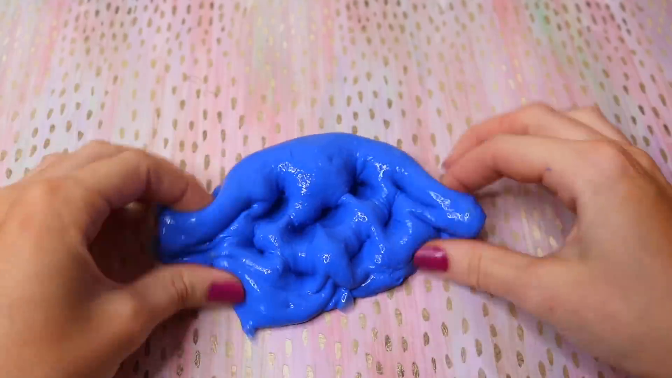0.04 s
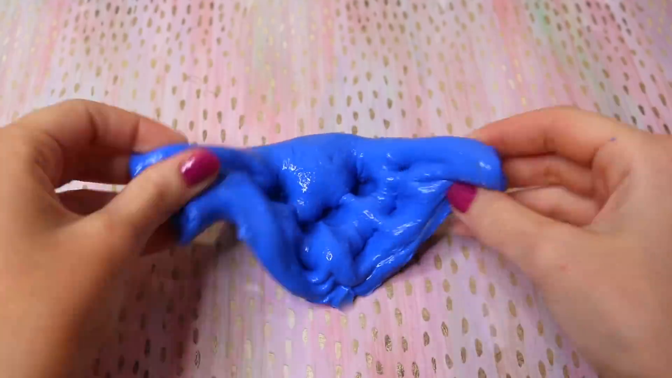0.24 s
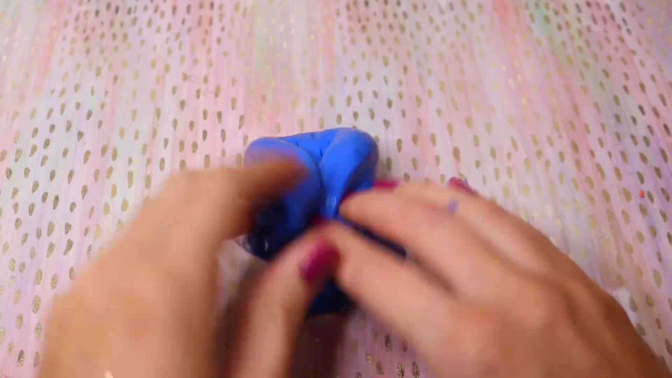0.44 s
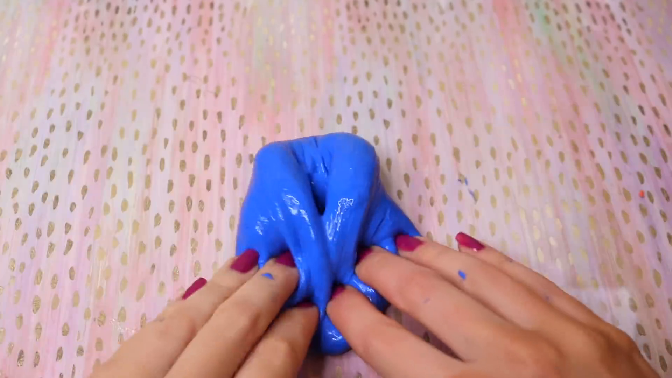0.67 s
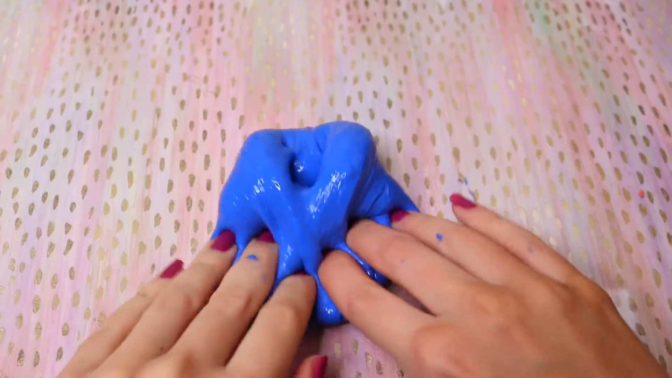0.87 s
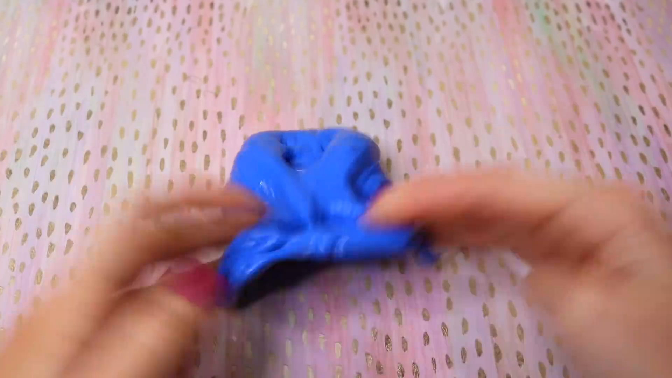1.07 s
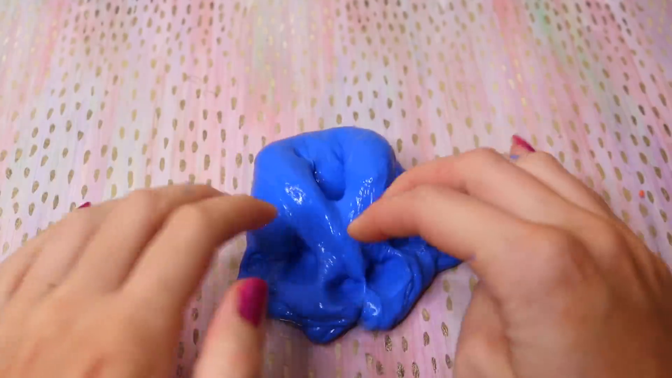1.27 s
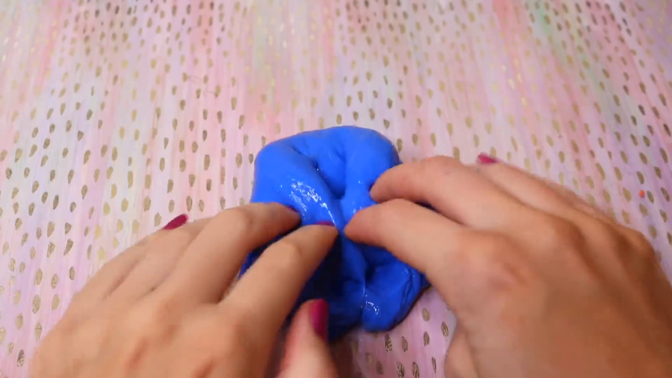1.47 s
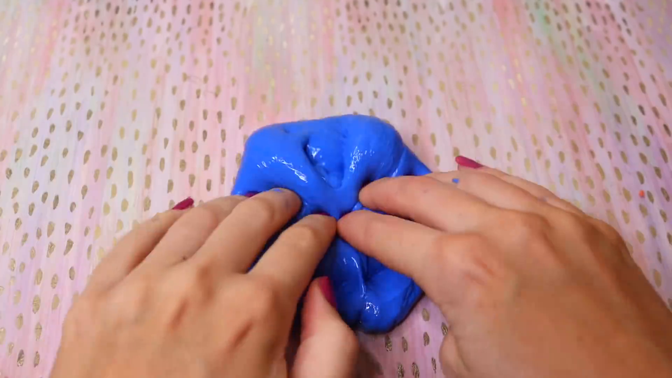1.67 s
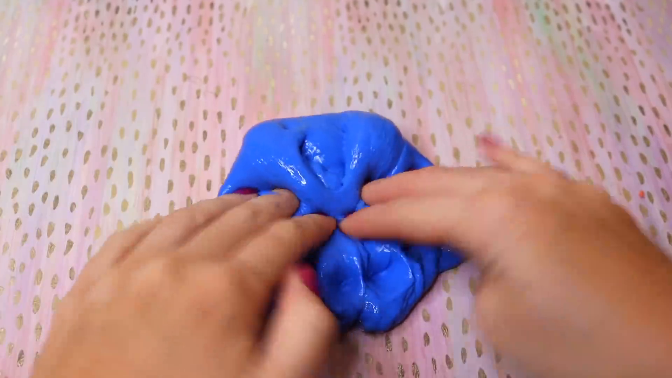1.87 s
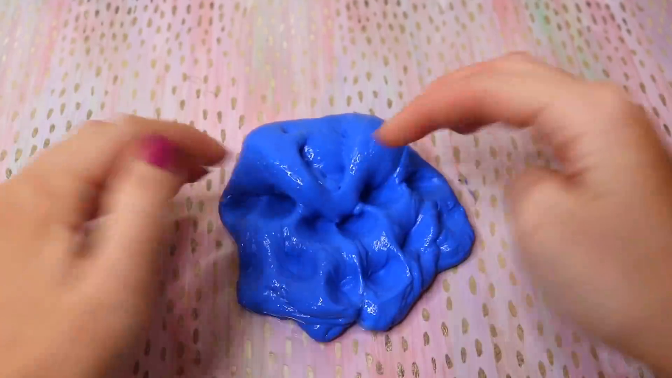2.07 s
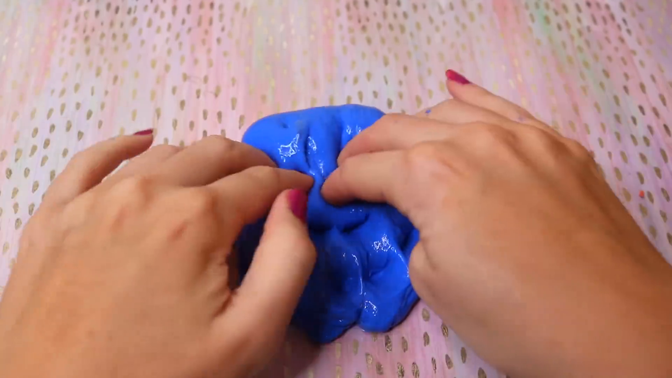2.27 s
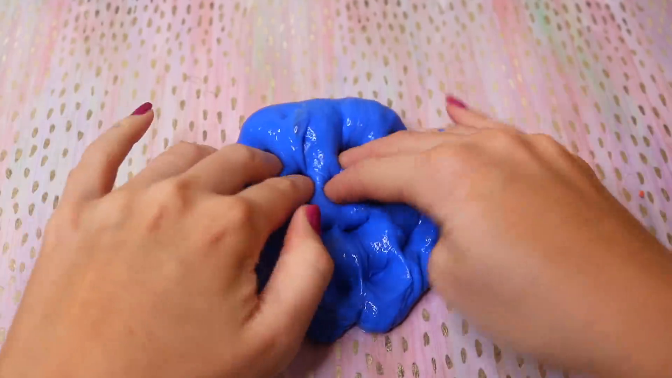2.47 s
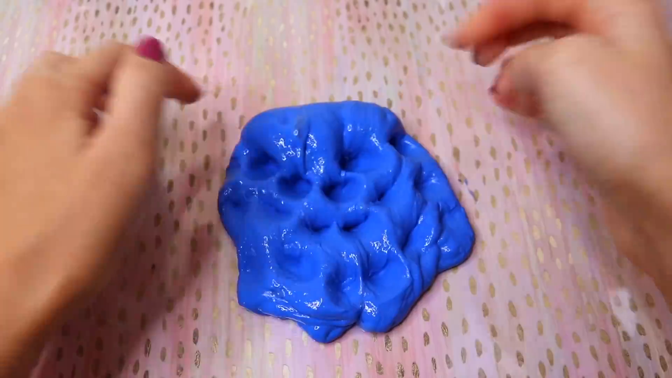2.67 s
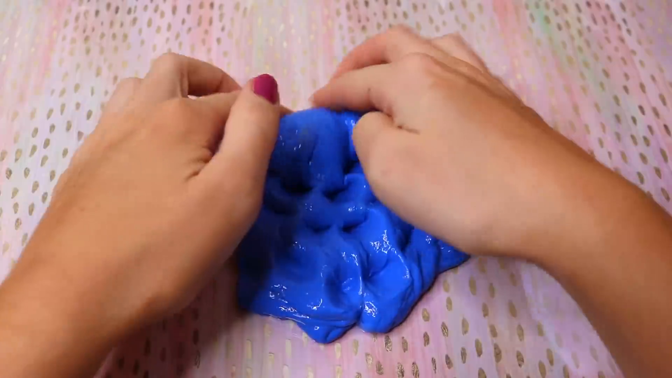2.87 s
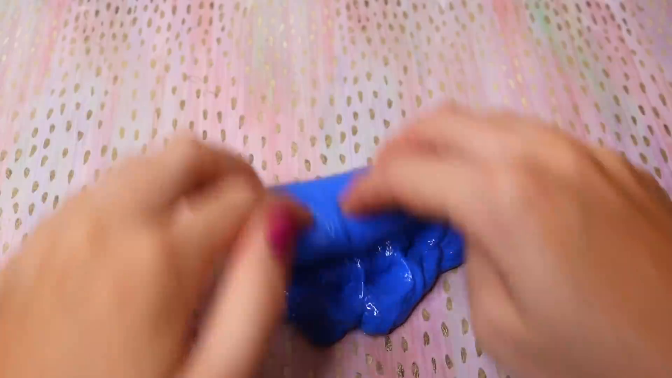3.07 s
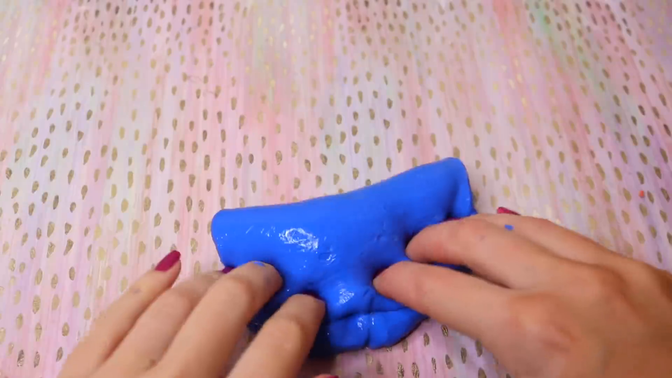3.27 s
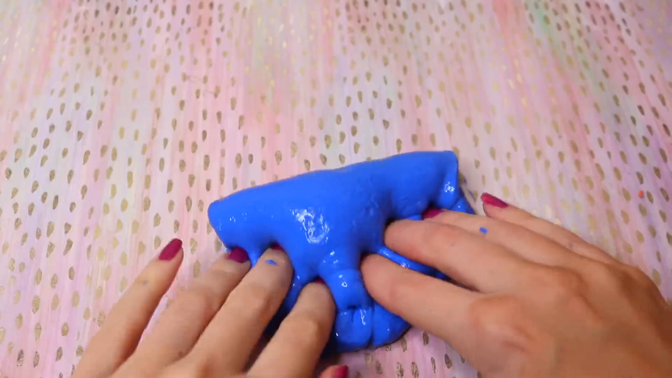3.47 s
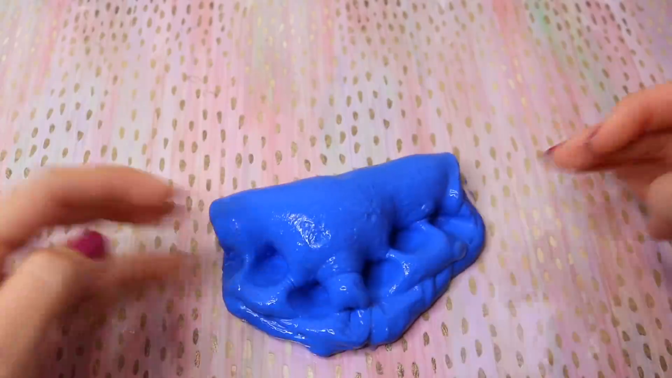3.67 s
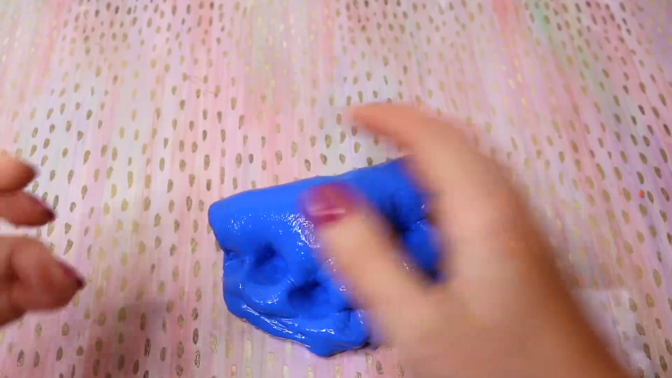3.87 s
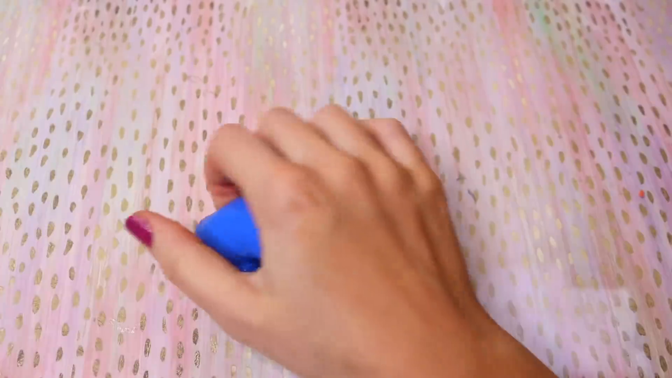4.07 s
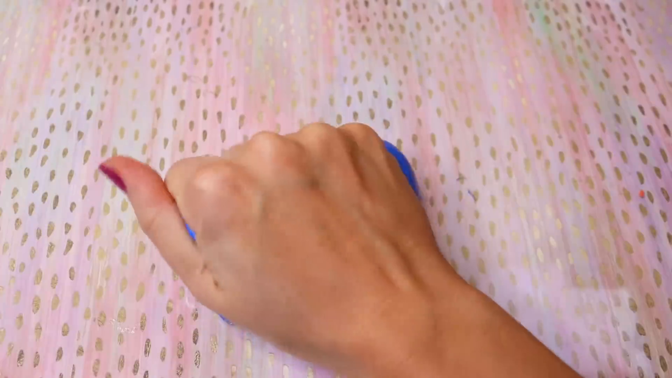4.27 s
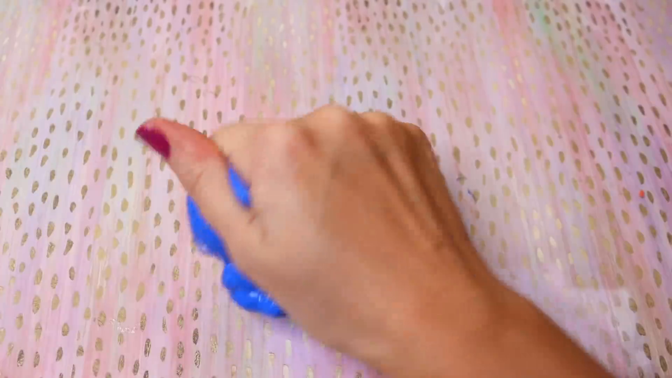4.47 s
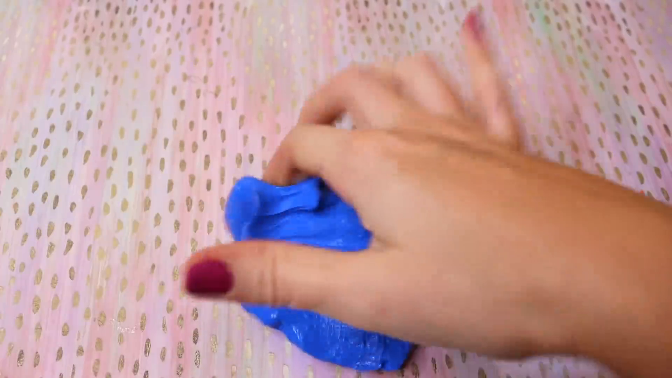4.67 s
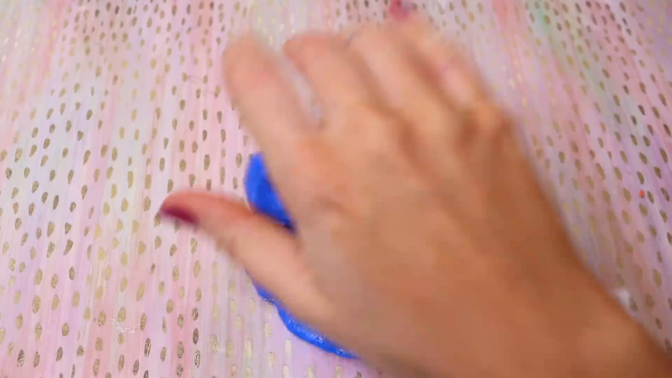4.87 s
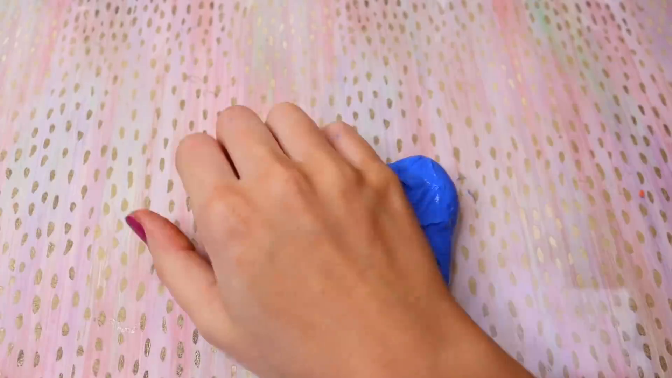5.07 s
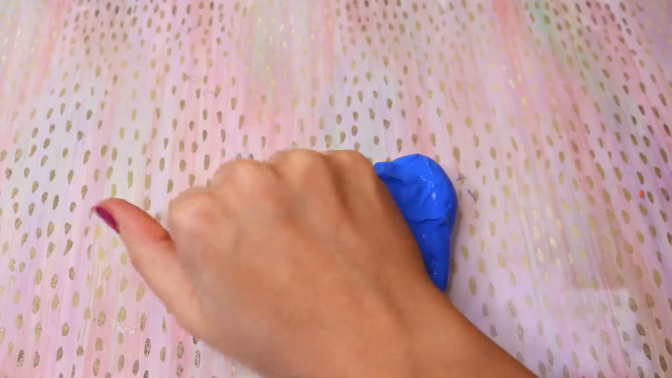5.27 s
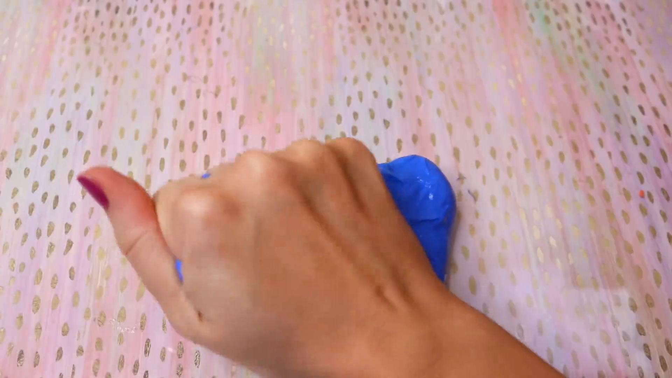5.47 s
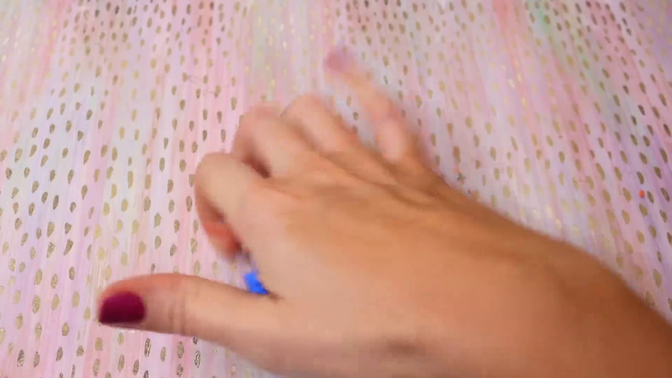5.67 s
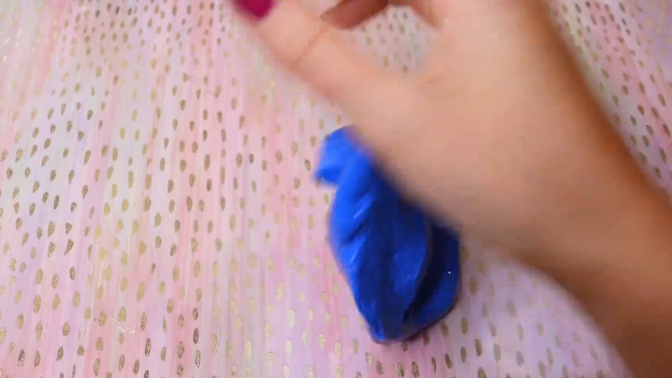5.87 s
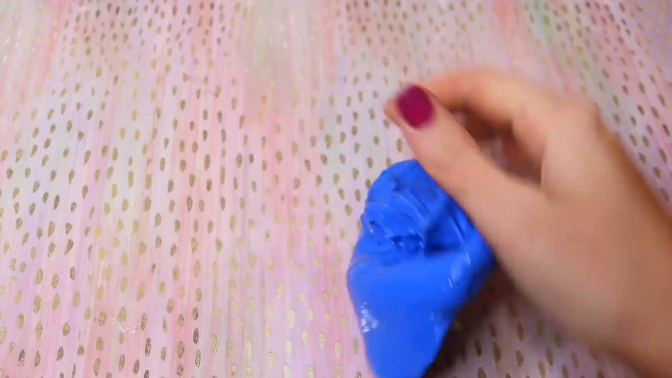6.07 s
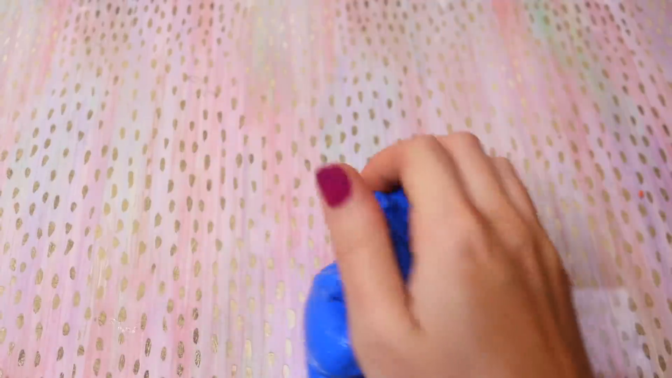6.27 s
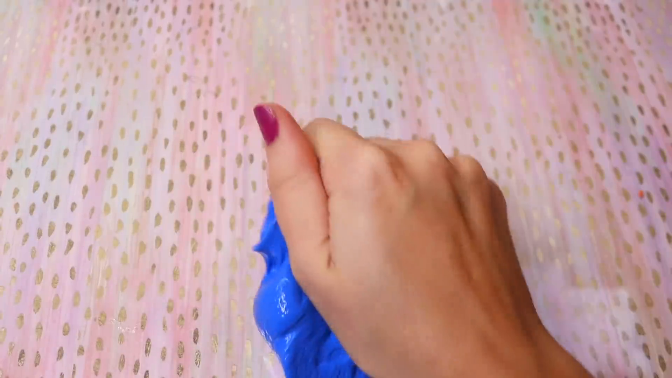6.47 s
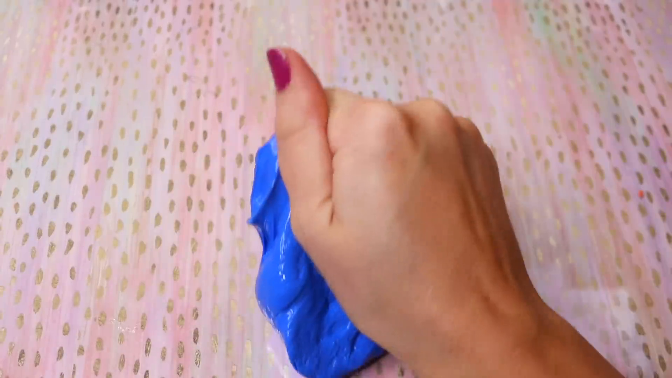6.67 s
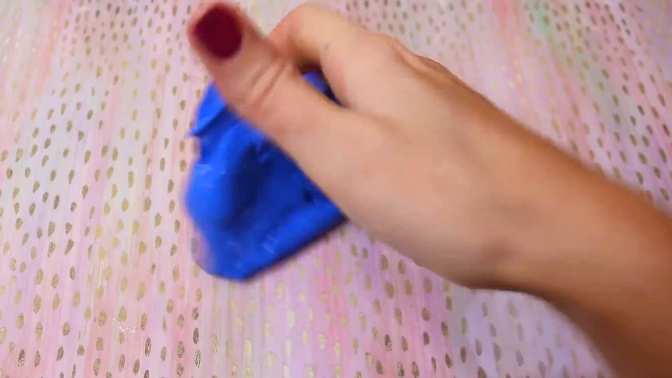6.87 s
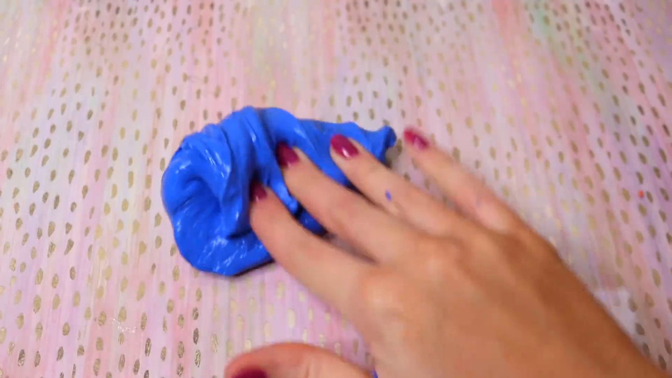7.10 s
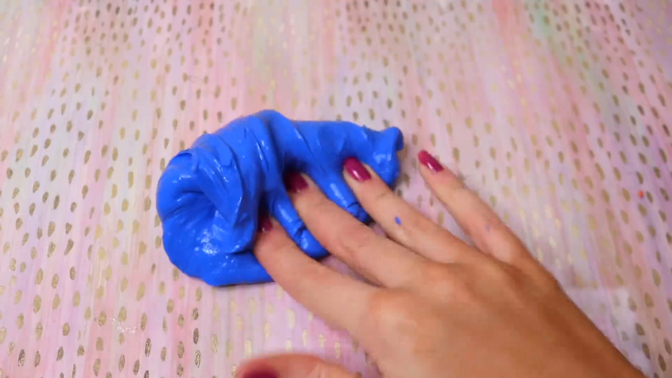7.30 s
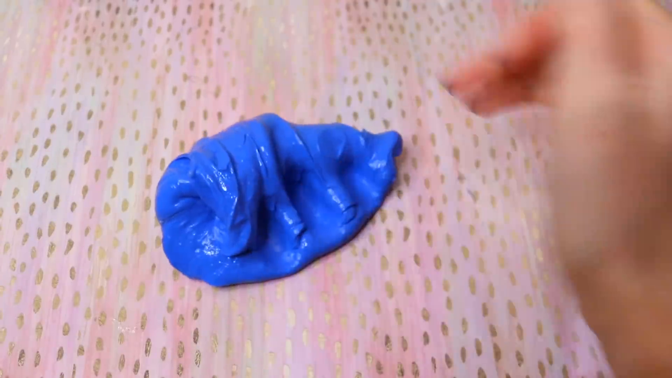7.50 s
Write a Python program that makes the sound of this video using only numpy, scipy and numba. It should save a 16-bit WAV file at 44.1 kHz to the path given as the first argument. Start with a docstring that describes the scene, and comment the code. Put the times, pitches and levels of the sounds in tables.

```python
"""Slime folded, pressed and squeezed by two hands on a table, close to a stereo microphone.
Wet folds crackle, fingers tick and thud, trapped bubbles burst with a snap of the skin and a ring
of the air pocket, and big pockets collapse in sinking gulps. Table and hands reflect each pop, the
quiet room rings briefly, an appliance hums and a limiter ducks after the loudest pops."""
import sys
import numpy as np
from scipy import signal
from scipy.fft import rfft, irfft
from scipy.io import wavfile
from numba import njit

SR = 44100
rng = np.random.default_rng(int(sys.argv[2]) if len(sys.argv) > 2 else 0)


def log_audio(samples):
    """Write samples as a 16-bit WAV file to the path given in sys.argv[1]."""
    # one column per channel
    frames = np.atleast_2d(samples).T
    # limit to full scale, then quantise
    limited = np.clip(frames, -1, 1)
    pcm = np.round(limited * 32767).astype(np.int16)
    wavfile.write(sys.argv[1], SR, pcm)


N = 332514
EVENT_SAMPLES = 6144

# bursting bubbles: start_s, pocket_hz, pocket_db, snap_db
POPS = [(0.3804, 3330, -9.5, -43), (.434, 2460, -15.5, -20.5), (.5548, 2000, -28.5, -27.5),
        (.811, 2040, -21.5, -70), (0.8468, 3200, -25, -14), (1.079, 1500, -26, -23),
        (1.2723, 2030, -15.5, -27), (1.2851, 1460, -4, -24), (1.5955, 2660, -39, -25),
        (1.6346, 3360, -63, -9), (1.9568, 2320, 1.5, 3.5), (1.9597, 1940, 4.5, -22), (1.978, 3400, 4, -17),
        (2.019, 1730, -38, -10), (2.036, 3040, -11.5, -34), (2.589, 1340, 3, -9), (2.5923, 1360, 3, -0.5),
        (2.6129, 3520, -0.5, 8.5), (2.664, 1370, -9, -10), (3.1539, 2260, -6, -10.5),
        (3.186, 3560, -16, -17), (3.3497, 1790, -16.5, -9.5), (3.6193, 860, 1, 9), (3.645, 2600, -6.5, -2),
        (3.648, 910, 0, 8), (3.6778, 2370, -13, -1), (4.2082, 2700, -14, -42), (4.2322, 2560, -15, -25),
        (4.2512, 2900, -2, 2), (4.279, 2310, -9.5, -19), (4.2943, 1430, -6.5, -21), (4.312, 3080, -1, -13),
        (4.339, 2690, -19, -5), (4.3554, 1570, -5.5, 3), (4.4075, 2950, -24, -10), (4.42, 2780, -28, -9),
        (4.4363, 3080, -1.5, 5), (4.5674, 2900, -16, -0.5), (4.608, 3730, -4.5, -11),
        (5.0467, 1480, -11.5, -25), (5.158, 1570, -14.5, -17), (5.351, 3270, -3.5, -5),
        (5.4532, 3000, -2, 0.5), (5.5123, 2300, 5.5, 22.5), (6.2529, 1720, -17.5, -19),
        (6.5, 3080, -25, -22), (6.5357, 2750, -29, -20), (6.5853, 1900, -11, -2.5), (6.5943, 2300, -4, 3),
        (6.6315, 865, 2.5, -5), (6.6315, 1406, 13, 20), (6.6328, 3200, 14.5, 8), (6.6974, 3300, 8, 10),
        (6.766, 3400, -17.5, -13)]


def undb(db):
    """Decibels to gain."""
    return 10 ** (np.asarray(db) / 20)


def unit(x):
    """Unit energy per channel."""
    return x / np.sqrt(np.sum(x ** 2, axis=-1, keepdims=True) + 1e-18)


def unit_stereo(x):
    """Unit mean energy over two channels, balance kept."""
    return x / np.sqrt(np.sum(x ** 2) / 2)


def add(track, start_s, sound):
    """Mix a short sound into a track."""
    i = int(np.clip(start_s * SR, 0, N - 1))
    track[..., i:i + sound.shape[-1]] += sound[..., :N - i]


def band(x, hz, q):
    """Two-pole band-pass resonance."""
    w = 2 * np.pi * min(hz, .42 * SR) / SR
    a = np.sin(w) / (2 * q)
    return signal.lfilter([a, 0, -a], [1 + a, -2 * np.cos(w), 1 - a], x)


def coloured(x, curve):
    """Equalise by a curve of freq_hz, gain_db rows."""
    hz, db = np.transpose(curve)
    f = np.fft.rfftfreq(N, 1 / SR) + 1
    return irfft(rfft(x) * undb(np.interp(np.log(f), np.log(hz), db)), N)


def fade(t, t60_s):
    """Exponential decay, 60 dB down at t60_s."""
    return np.exp(-np.log(1000) * t / t60_s)


def ring(hz, t60_s, glide=0):
    """Struck resonance; pitch slides by the fraction glide as it fades."""
    t = np.arange(EVENT_SAMPLES) / SR
    pitch_hz = hz * (1 + glide * np.minimum(t / t60_s, 1))
    return np.sin(2 * np.pi * np.cumsum(pitch_hz) / SR) * fade(t, t60_s)


def crackle(samples, per_s, spread_db):
    """Random impulses, mostly small, a few large."""
    fires = rng.random(samples) < per_s / SR
    strength = np.minimum(rng.exponential(size=samples), 3)
    return fires * undb(spread_db * strength) * rng.choice([-1, 1], samples)


def reflected(x):
    """Direct sound plus reflections off table, hands and camera, redrawn per call as the hands move."""
    # near reflections: delay_s, spread_s, left_db, right_db
    reflections = [(.0009, 0.0016, -2, -6.5), (.0020, 0.0005, -8, 0), (.0032, 0.0033, -12, -15),
                   (.0070, .002, -10.5, -25.5), (.009, 0.028, -13.5, -11.5)]
    t = np.arange(EVENT_SAMPLES) / SR
    response = np.zeros((2, EVENT_SAMPLES))
    for delay_s, spread_s, *sides_db in reflections:
        age_s = t - delay_s * rng.uniform(.85, 1.15)
        envelope = (age_s > 0) * np.exp(-2 * np.abs(age_s) / spread_s)
        scatter = rng.standard_normal((2, EVENT_SAMPLES)) ** 3 * envelope
        response += undb(sides_db)[:, None] * unit(scatter)
    response[[0, 1], rng.integers(3, size=2)] += 1  # direct path, 0-2 samples late per side
    return signal.fftconvolve(x[None], unit_stereo(response), axes=1)


def background(air_db=-54.5, widen_hz=900, bass_width=0.52, waver_hz=0.13):
    """Room rumble, microphone hiss and a slightly wavering appliance hum."""
    # noise spectrum: freq_hz, relative_density_db
    air_curve = [(15, -62), (25, -7.5), (70, -10), (123, -5.5), (145, -8), (175, -12), (242, -8),
                 (516, -13), (1070, -18.5), (1290, -14.5), (1700, -20), (5000, -26.5), (9320, -24),
                 (14000, -30), (16000, -38)]
    # hum partials: pitch_hz, level_db
    partials = [(59.2, -66.5), (118.6, -57), (237.2, -68.5)]
    f, t = np.fft.rfftfreq(N, 1 / SR) + 1, np.arange(N) / SR
    mid, side = rfft(coloured(rng.standard_normal((2, N)), air_curve))
    width = bass_width + (1 - bass_width) * f / (f + widen_hz)
    air = unit(irfft(mid + np.array([[1], [-1]]) * width * side, N)) * np.sqrt(N) * undb(air_db)
    drift = np.interp(t, np.arange(20) / 2, rng.standard_normal(20))
    warped_s = t + waver_hz * drift / partials[0][0] / 2
    hum = sum(np.sqrt(2) * undb(db) * np.sin(2 * np.pi * hz * warped_s) for hz, db in partials)
    return air + hum


def squelches(per_s=400, spread_db=7, bubble_hz=1500, scatter_octaves=0.93, low_cut_hz=750,
              fizz_hz=8000):
    """A moving fold bursts tiny bubbles and its sticky skin fizzes. Returns near stereo, mono source."""
    # wet folds closing or peeling: middle_s, length_s, bubbles_db, fizz_db
    folds = [(0.092, .18, -51, -66), (1.136, .125, -41.5, -48), (1.995, 0.1, -35, -62),
             (2.657, 0.043, -54, -37), (4.053, 0.13, -52.5, -54), (4.318, .11, -47, -41.5),
             (4.61, 0.16, -38.5, -48.5), (5.105, 0.078, -51, -52.5), (5.387, 0.055, -53, -45.5),
             (5.655, 0.19, -45.5, -56), (6.39, 0.13, -54.5, -61), (6.86, 0.061, -38.5, -43.5),
             (6.939, .13, -54.5, -52), (7.455, 0.087, -42.5, -52)]
    # bubble sizes in a fold: pitch_ratio, share_db
    swarm = [(.62, -3), (.98, 1.5), (1.55, 1), (2.3, 1), (3.2, -10)]
    near, source = np.zeros((2, N)), np.zeros(N)
    low_cut = signal.butter(4, low_cut_hz, "highpass", fs=SR, output="sos")  # too small to radiate bass
    for middle_s, length_s, bubbles_db, fizz_db in folds:
        samples = int(length_s * SR)
        swell = np.sin(np.pi * np.arange(samples) / samples) ** 0.89
        bubbles = 0
        for pitch_ratio, share_db in swarm:
            hz = bubble_hz * pitch_ratio * 2 ** (scatter_octaves * rng.standard_normal())
            bursts = swell * crackle(samples, per_s, spread_db)
            bubbles += undb(share_db) * unit(band(band(bursts, hz, q=1.6), hz, q=0.1))
        fizz = band(swell * crackle(samples, per_s, spread_db), fizz_hz, q=1.0)
        wet = undb(bubbles_db) * unit(bubbles) + undb(fizz_db) * unit(fizz)
        fold = np.sqrt(samples / 2) * signal.sosfilt(low_cut, wet)
        add(near, middle_s - length_s / 2, reflected(fold))
        add(source, middle_s - length_s / 2, fold)
    return near, source


def ticks(low_db=-30, high_db=-35):
    """Fingertips stick and let go with faint ticks."""
    releases = crackle(N, per_s=9, spread_db=4)
    low, high = band(releases, hz=2800, q=6.1), band(releases, hz=8000, q=3.5)
    return undb(low_db) * low + undb(high_db) * high


def thuds(trim_db=0.5, t60_cycles=12, rise_cycles=0.9, table_db=-3, reach_octaves=0.84, slap_db=-13):
    """Each press or gulp swells a damped low tone with a wet slap; table modes near its pitch ring on."""
    # fingers pressing through to the table: time_s, pitch_hz, energy_db
    presses = [(0.129, 259, -26), (1.079, 343, -18), (1.284, 282, -15.5), (1.957, 329, -11.5),
               (2.874, 274, -15), (3.154, 700, -19), (3.35, 467, -23), (4.069, 266, -24), (4.235, 313, -20),
               (4.68, 378, -23.5), (5.046, 278, -14.5), (5.158, 340, -13.5), (5.254, 270, -10.5),
               (6.18, 250, -26.5), (6.45, 258, -19), (7.446, 331, -16)]
    # table modes: mode_hz, t60_s, mode_db
    modes = [(249, 0.8, -4), (268.3, 0.22, 5), (385, 0.099, -2), (410.4, 0.17, 2), (542, 0.11, -0.5),
             (754, 0.047, 5)]
    out, t = np.zeros(N), np.arange(EVENT_SAMPLES) / SR
    for time_s, hz, energy_db in presses + gulps():
        push = 1 - np.exp(-(t * hz / rise_cycles) ** 2)  # big pockets give way more slowly
        pocket = unit(push * ring(hz, t60_cycles / hz, glide=0.035))
        table = 0
        for mode_hz, t60_s, mode_db in modes:
            detuning = np.log2(mode_hz / hz) / reach_octaves
            table += undb(mode_db) / (1 + detuning ** 2) * unit(push * ring(mode_hz, t60_s))
        splash = push * rng.standard_normal(EVENT_SAMPLES) * fade(t, t60_s=0.076)
        slap = unit(band(splash, hz=700, q=6.1))
        thud = unit(pocket + undb(table_db) * table + undb(slap_db) * slap)
        add(out, time_s - rise_cycles / hz / 2, undb(energy_db + trim_db) * thud)
    return out


def pops(trim_db=1, slack_hz=7730, tight_hz=9950, tear_s=0.00027, tear_db=-7,
         creak_s=0.0011, creak_db=-18):
    """Skin creaks, tears with a snap, and the opened pocket rings. Returns near stereo, mono source."""
    # a clenched fist pulls the skin tight: start_s, end_s
    fists = [(4.22, 4.5), (5.3, 5.6)]
    near, source = np.zeros((2, N)), np.zeros(N)
    lead_samples = EVENT_SAMPLES // 16
    t = (np.arange(EVENT_SAMPLES) - lead_samples) / SR
    for start_s, pocket_hz, pocket_db, snap_db in POPS:
        tight = any(begin_s < start_s < end_s for begin_s, end_s in fists)
        snap_hz = tight_hz if tight else slack_hz
        grit = rng.standard_normal(EVENT_SAMPLES)
        tear = undb(tear_db) * unit(grit * (t > 0) * np.exp(-np.abs(t) / tear_s))
        creak = undb(creak_db) * unit(grit ** 3 * (t < 0) * np.exp(-np.abs(t) / creak_s))
        burst = (t == 0) + tear + creak
        paths = reflected(np.ones(1))  # one response for pocket and snap
        # bursts nearly all pocket or all snap ring longer; gentle ones ring a little shorter
        gentle_db, uneven_db = max(-max(pocket_db, snap_db), 0), abs(pocket_db - snap_db)
        q = 1.235 * 2 ** (-0.02 * gentle_db + 0.033 * uneven_db)
        for hz, db, polarity in ((pocket_hz, pocket_db, -1), (snap_hz, snap_db, 1)):
            sound = polarity * band(band(burst, hz, q), hz, 0.14 * q)
            heard = signal.fftconvolve(sound[None], paths, axes=1)
            add(near, start_s - lead_samples / SR, undb(db + trim_db) * unit_stereo(heard))
            add(source, start_s - lead_samples / SR, undb(db + trim_db) * unit(sound))
    return near, source


def overload_thumps(base_db=-36, db_per_pop_db=1.63):
    """A short dry low thump of overload under the loudest pops."""
    impulses = np.zeros(N)
    for start_s, _, pocket_db, snap_db in POPS:
        add(impulses, start_s, undb([base_db + db_per_pop_db * max(pocket_db, snap_db)]))
    thump = unit(band(signal.unit_impulse(EVENT_SAMPLES), hz=240, q=0.31))
    return signal.fftconvolve(impulses, thump)[:N]


def gulps(count=3):
    """A big pocket collapses in sinking, fading thuds. Returns rows of time_s, pitch_hz, energy_db."""
    # collapsing pockets: start_s, length_s, first_hz, last_hz, first_db, last_db
    collapses = [(1.983, 0.047, 456, 266, -3.5, -11.5), (2.594, 0.055, 480, 268, -3, -4.5),
                 (3.618, .058, 855, 500, -7.5, -12), (4.29, 0.00648, 836, 472, -12, -17)]
    rows = []
    for start_s, length_s, first_hz, last_hz, first_db, last_db in collapses:
        for progress in np.linspace(0, 1, count):
            pitch_hz = first_hz * (last_hz / first_hz) ** progress
            energy_db = first_db + (last_db - first_db) * progress
            rows.append((start_s + length_s * progress, pitch_hz, energy_db))
    return rows


def room(x, build_s=0.0026, widen_hz=700):
    """Fast-building diffuse tail; its bass is alike at both microphones."""
    # tail bands: centre_hz, t60_s, level_db
    bands = [(150, 0.48, -9), (295, 0.39, -5.5), (700, 0.42, -8.5), (1380, 0.27, -11.5),
             (3000, 0.33, -15.5), (5400, 0.43, -12.5), (8000, 0.38, -14), (10200, 0.31, -12.5),
             (16700, .33, -18)]
    samples = SR * 3 // 4
    t, f = np.arange(samples) / SR, np.fft.rfftfreq(samples, 1 / SR) + 1
    mid, side = rfft(rng.standard_normal((2, samples)))
    width = f / (f + widen_hz)
    field = (mid + np.array([[1], [-1]]) * width * side) / np.sqrt(1 + width ** 2)
    log_centres, response = np.log([row[0] for row in bands]), 0
    for selector, (_, t60_s, level_db) in zip(np.eye(len(bands)), bands):
        envelope = unit(fade(t, t60_s) * (1 - np.exp(-(t / build_s) ** 2)))
        noise = irfft(field * np.interp(np.log(f), log_centres, selector), samples)
        response += undb(level_db) * envelope * noise
    return signal.fftconvolve(x[None], response, axes=1)[:, :N]


def scene(right_db=1.08, thud_send_db=-3):
    """Slime just right of centre, with near reflections, room and background."""
    # microphone colour on the slime: freq_hz, gain_db
    mic_curve = [(500, 4.5), (900, 2.5), (1350, 2.5), (2200, -2.5), (3800, -0.5), (5200, -4.5), (7800, 2),
                 (10500, 3.5), (13000, 4), (16000, 4.5)]
    near_pops, pop_source = pops()
    near_folds, fold_source = squelches()
    thudding, ticking = thuds(), ticks()
    near = near_pops + near_folds + thudding + overload_thumps() + reflected(ticking)[:, :N]
    tail = room(pop_source + fold_source + ticking + undb(thud_send_db) * thudding)
    return coloured(near + tail, mic_curve) * undb([0, right_db])[:, None] + background()


@njit
def follow(x, attack_s, release_s):
    """Peak follower: fast rise, slow fall."""
    out, level = np.empty(len(x)), 0.
    for i in range(len(x)):
        level += (x[i] - level) / (SR * (attack_s if x[i] > level else release_s))
        out[i] = level
    return out


def record(dry, limit_db=-4, asymmetry=0.079, top_hz=16200):
    """A limiter ducks after the loudest pops, their first peaks clip unevenly, and the top is cut."""
    peak = follow(np.abs(dry).max(axis=0), attack_s=0.00056, release_s=0.075)
    limited = np.clip(dry / np.maximum(1, peak / undb(limit_db)), -1, 1)
    lopsided = limited - asymmetry * limited ** 4  # overload squashes one half-wave: a short dry thump
    return signal.sosfilt(signal.ellip(10, .2, 85, top_hz, fs=SR, output="sos"), lopsided)


dry = scene()
out = record(dry)
log_audio(out)
```